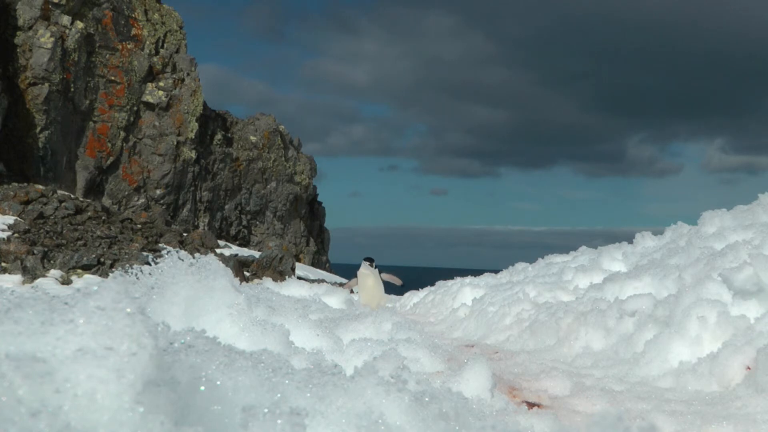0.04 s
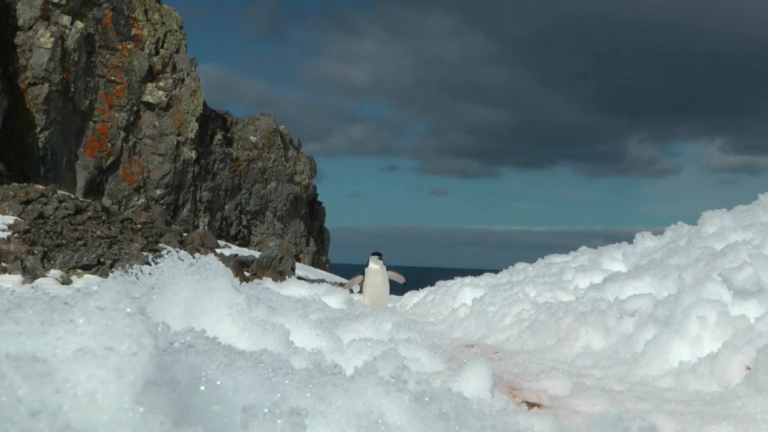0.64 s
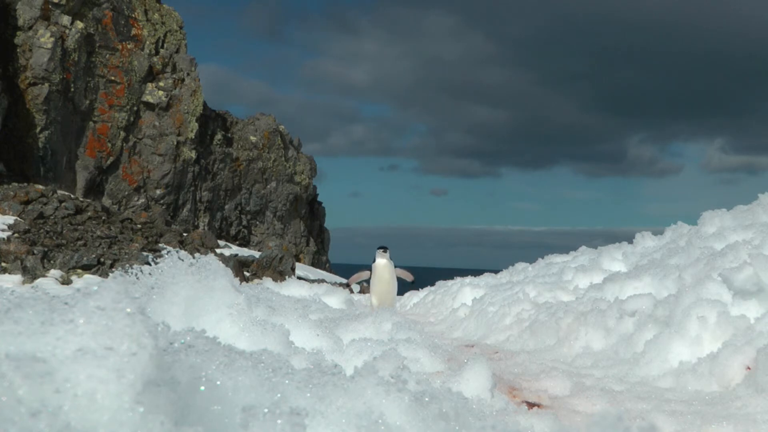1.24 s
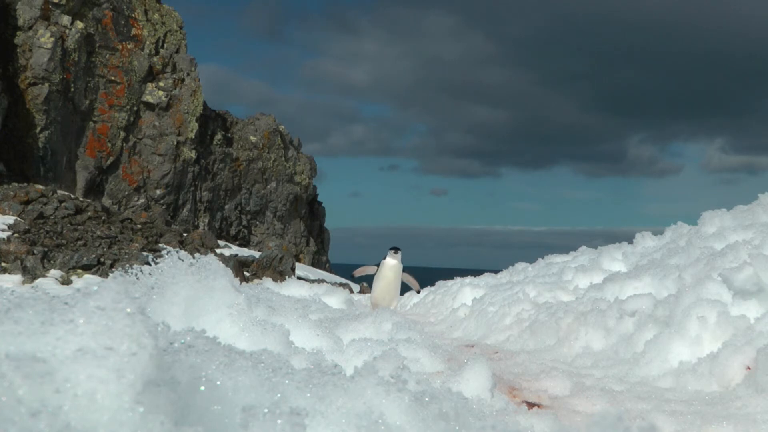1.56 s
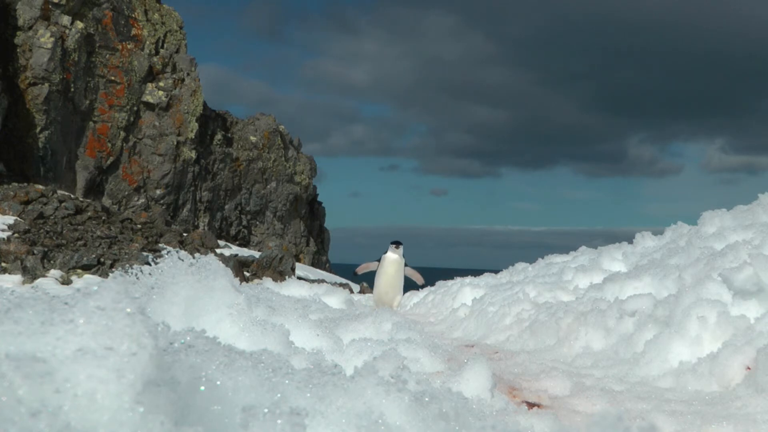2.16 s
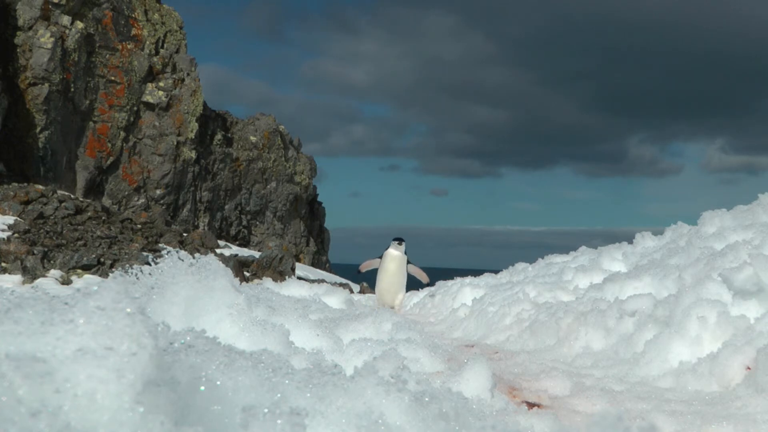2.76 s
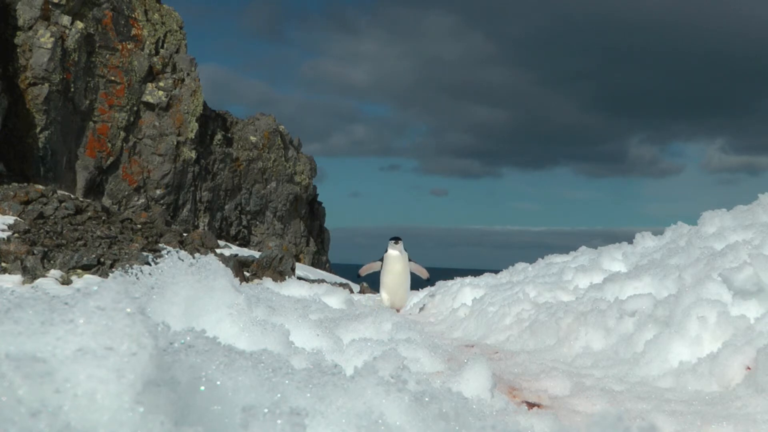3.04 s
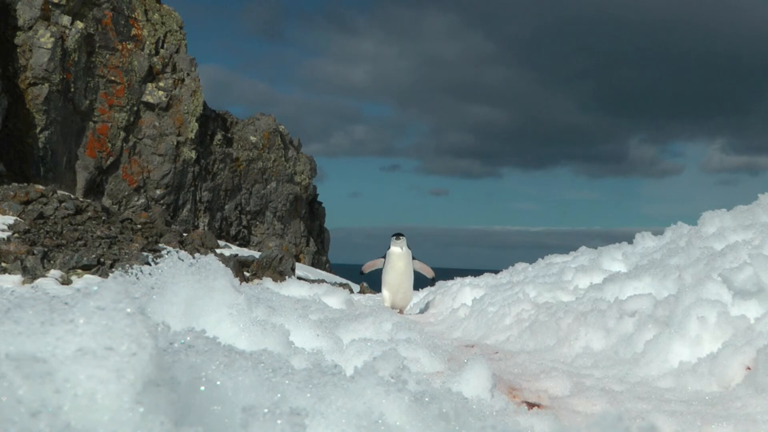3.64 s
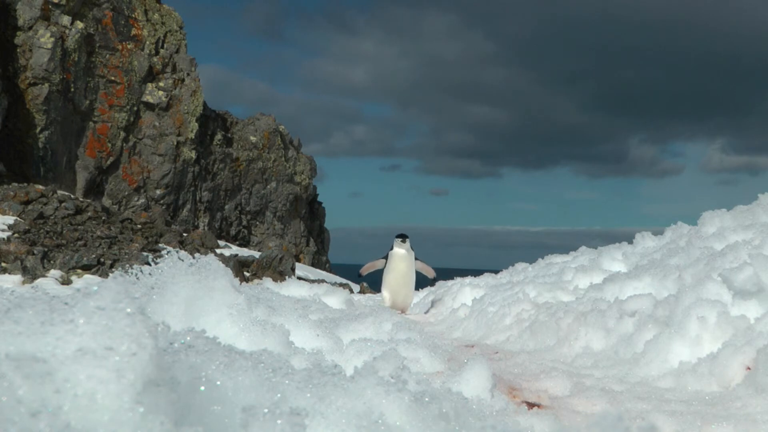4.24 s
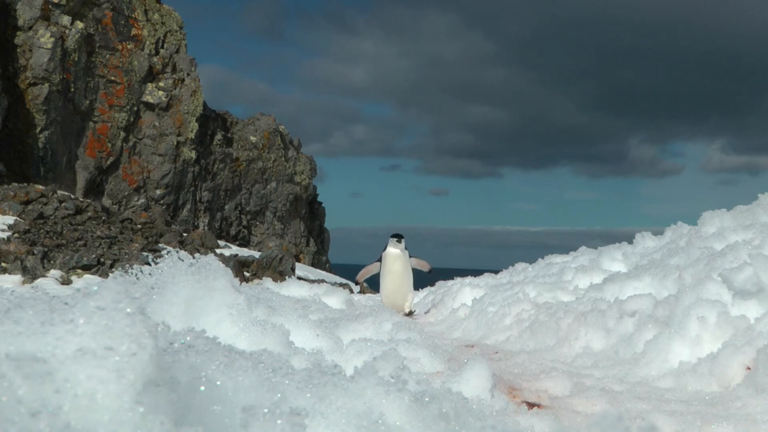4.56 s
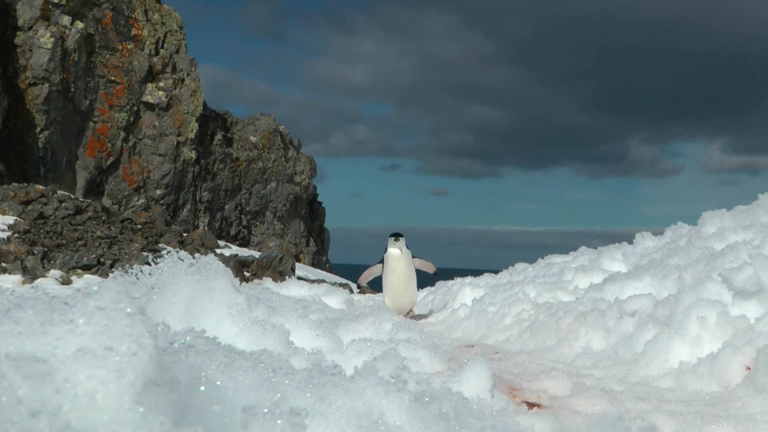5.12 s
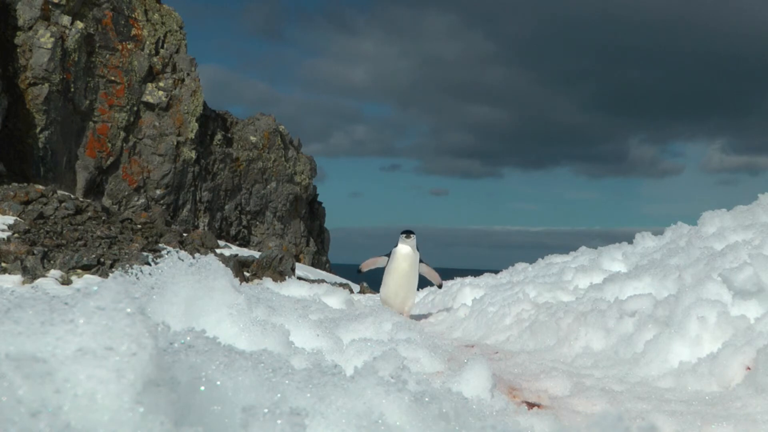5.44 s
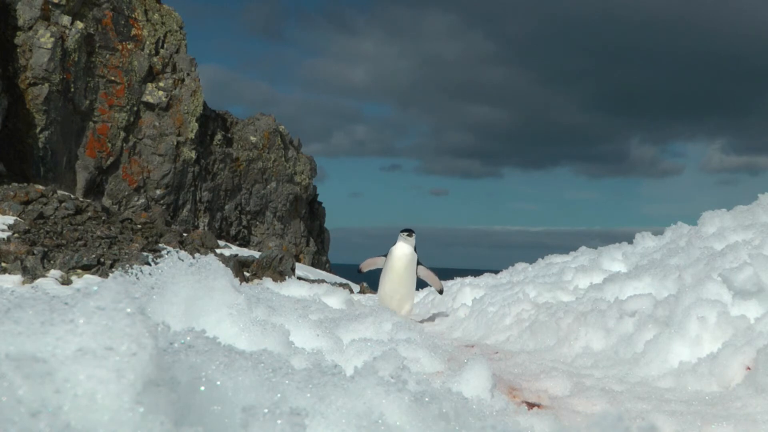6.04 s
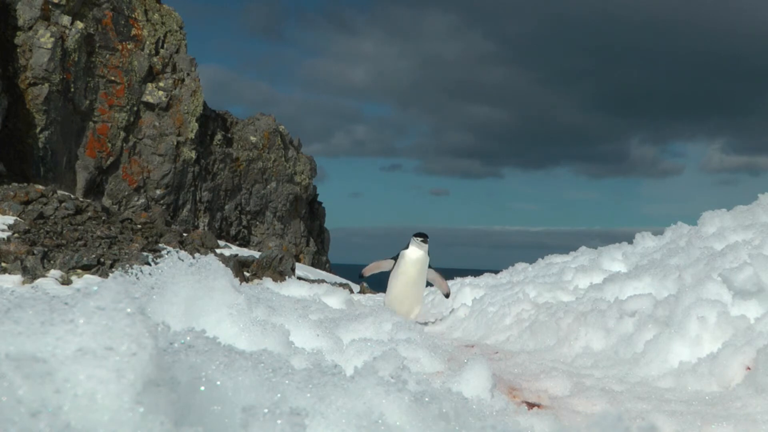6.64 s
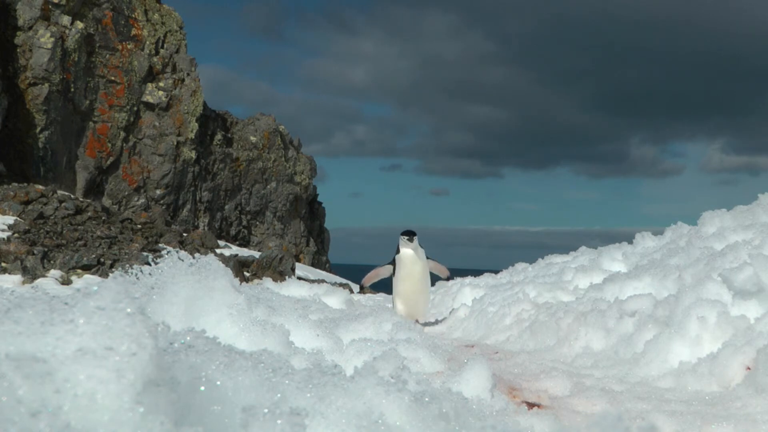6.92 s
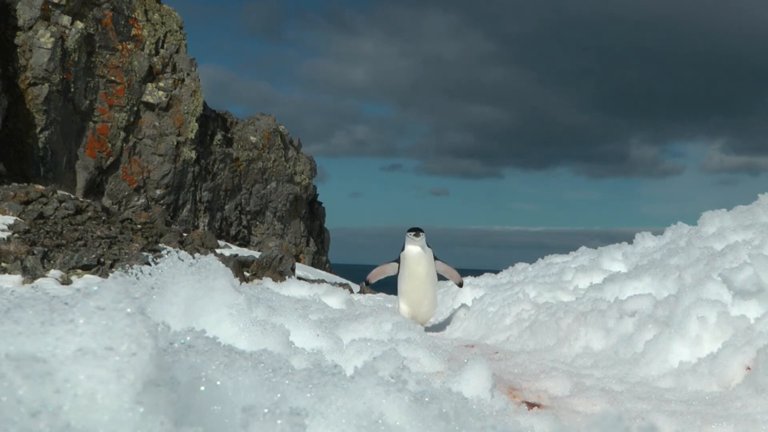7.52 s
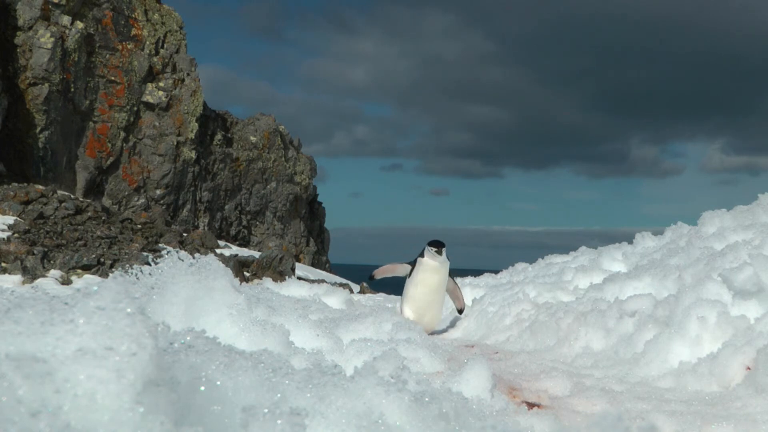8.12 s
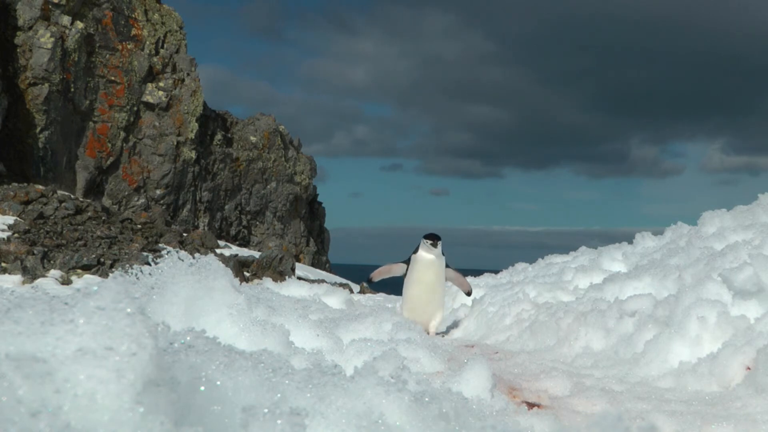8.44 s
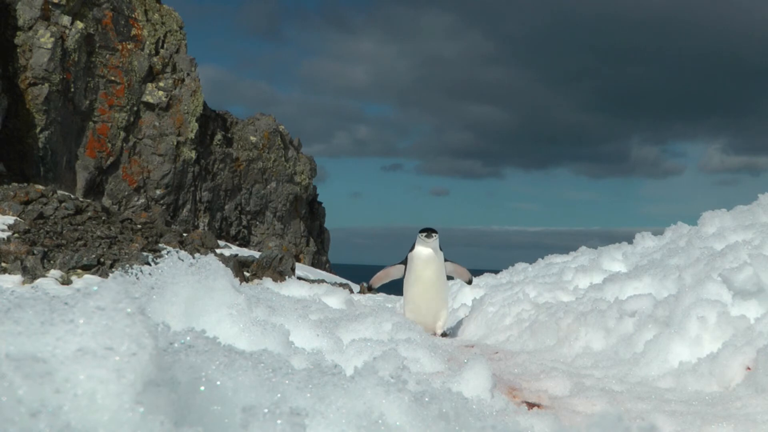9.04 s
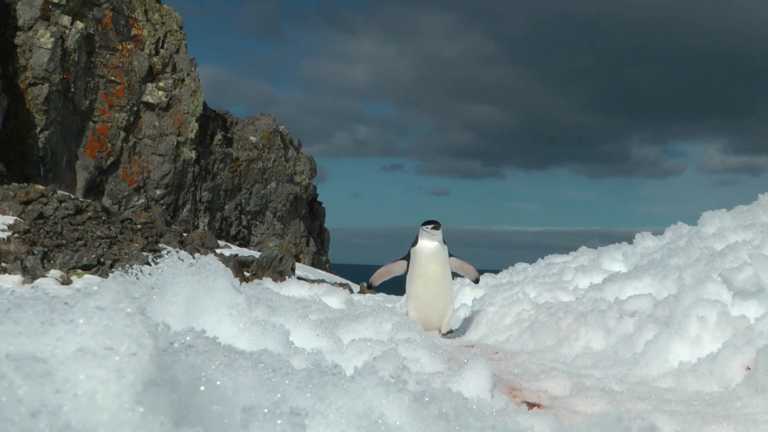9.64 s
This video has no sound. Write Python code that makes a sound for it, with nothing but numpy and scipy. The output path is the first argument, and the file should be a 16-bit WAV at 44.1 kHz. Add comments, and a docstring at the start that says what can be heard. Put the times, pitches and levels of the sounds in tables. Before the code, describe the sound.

Wind buffets the microphone on a snowy shore as distant penguins trade short honks, hoarse brays and squeaky yelps.

```python
"""Penguins whoop, squawk and yelp some way off on a snowy shore, over the din of their colony.
The syrinx whoops upward on indrawn air, squawks downward on pressed-out air, holds arching honks
and breaks into yelps; its two sides clash in hoarse brays. Gusts thump the microphone over an
uneven breeze, snow crunches faintly, and the camera adds its own hum and hiss."""
import sys
import numpy as np
from scipy import signal
from scipy.fft import rfft, irfft, next_fast_len
from scipy.io import wavfile
from scipy.ndimage import uniform_filter1d

SR = 44100
rng = np.random.default_rng(int(sys.argv[2]) if len(sys.argv) > 2 else 0)


def output_pcm(signal):
    """Save a mono or channel-first signal as 16-bit PCM at the path in sys.argv[1].

    Samples are clipped to [-1, 1] before scaling.
    """
    pcm = np.clip(np.atleast_2d(signal).T, -1, 1) * 32767
    wavfile.write(sys.argv[1], SR, np.round(pcm).astype(np.int16))


N = 431298
TIME = np.arange(N) / SR


def undb(db):
    """Decibels to gain."""
    return 10 ** (np.asarray(db) / 20)


def unit(x):
    """Scale to rms 1."""
    return x / np.sqrt(np.mean(x ** 2) + 1e-20)


def spectrum_db(points, hz):
    """Interpolate (Hz, dB) points on a log-frequency axis."""
    f, db = np.transpose(points)
    return np.interp(np.log(hz + 1), np.log(f), db)


def colour(x, db_at):
    """Filter by the gain db_at(hz); rms 1."""
    size = next_fast_len(len(x))
    gain = undb(db_at(np.fft.rfftfreq(size, 1 / SR)))
    return unit(irfft(rfft(x, size) * gain, size)[:len(x)])


def lowpass(x, hz):
    """Zero-phase low-pass."""
    return signal.sosfiltfilt(signal.butter(2, hz, fs=SR, output="sos"), x)


def noise(points, n=N):
    """Noise shaped by (Hz, dB) points; rms 1."""
    return colour(rng.standard_normal(n), lambda f: spectrum_db(points, f))


def walk(rate_hz, n=N):
    """Smooth random wander; spread near 1."""
    k = max(int(SR / rate_hz), 2)
    steps = np.repeat(rng.standard_normal(n // k + 1), k)
    return 1.3 * uniform_filter1d(uniform_filter1d(steps, k), k)[:n]


def phase_rad(hz):
    """Running phase of a pitch curve."""
    return 2 * np.pi * np.cumsum(hz) / SR


def swell(n, rise_s, fall_s):
    """Envelope that opens, holds and closes."""
    t = np.arange(n) / SR
    opening = np.sin(np.pi / 2 * np.clip(t / rise_s, 0, 1))
    closing = np.sin(np.pi / 2 * np.clip((t[-1] - t) / fall_s, 0, 1))
    return opening * closing


def pulse(t, peak_s):
    """Envelope that rises to 1, then decays."""
    return t / peak_s * np.exp(1 - t / peak_s)


def add(track, start_s, x):
    """Mix x into track."""
    i = int(start_s * SR)
    x = x[max(-i, 0):max(N - i, 0)]
    i = max(i, 0)
    track[i:i + len(x)] += x


# camera noise floor: (frequency [Hz], level [dB])
HISS_SPECTRUM = [(20, 12), (90, 31), (180, 1), (330, 8), (600, 6.5), (1200, 2), (4000, 4), (9000, -4.5),
                 (14000, -1.5), (16000, -11)]
def camera_hiss(mid_db=-56.5, side_db=-62.5):
    """Steady self-noise; returns mid, side."""
    side = noise([(30, 19), (120, 11.5), (400, -1), (1000, -2), (3000, -125), (7500, -14), (11000, -36)])
    return undb(mid_db) * noise(HISS_SPECTRUM), undb(side_db) * side


# motor resonances: (frequency [Hz], width [Hz], level [dB])
MOTOR_MODES = [(243, 11.2, -69), (707, 16.35, -72.5), (799, 14.37, -78)]
def motor_hum():
    """Narrow, wavering resonances of the camera motor."""
    out = np.zeros(N)
    for hz, width_hz, db in MOTOR_MODES:
        tone = np.sin(phase_rad(hz + width_hz / 2 * walk(40)))
        out += undb(db) * unit(tone * undb(2 * walk(20)))
    return out


# snow giving way: (start [s], length [s], level [dB])
SNOW_CRUNCHES = [(4.4, 0.22, -64), (5.343, .06, -65), (6.484, 0.071, -65), (7.847, 0.16, -61),
                 (8.183, 0.13, -63.5), (8.513, 0.042, -55.5), (8.548, 0.053, -58.5)]
def snow():
    """Icy grains give way in short, fine crunches."""
    out = np.zeros(N)
    for start_s, length_s, db in SNOW_CRUNCHES:
        n = int(length_s * SR)
        grains = noise([(1000, -1), (6000, 17), (14000, 10.5), (16000, -25)], n)
        grains *= undb(2 * walk(700, n))
        add(out, start_s, undb(db) * unit(grains) * swell(n, rise_s=.01, fall_s=.034))
    return out


# flow between gusts: (time [s], level [dB])
BREEZE_LEVELS = [(0.0, -52), (1.06, -69.5), (1.39, -52), (1.82, -53.5), (2.86, -51.5), (3.18, -43.5),
                 (3.51, -37.5), (3.89, -42.5), (4.22, -38.5), (4.6, -46), (4.98, -47), (5.45, -41.5),
                 (5.94, -40.5), (6.29, -49.5), (7.05, -54.5), (7.25, -47), (7.46, -57), (7.71, -51.5),
                 (8.12, -42), (9.67, -51), (9.78, -68)]
# gusts: (time [s], decay [s], level [dB], front jolt re gust [dB])
WIND_GUSTS = [(.225, 0.047, -38, -4), (1.25, 0.077, -34.5, 0), (1.512, 0.089, -38.5, 11),
              (1.693, 0.037, -44, -3), (2.017, 0.073, -30.5, 1), (2.263, 0.055, -36, -16),
              (2.343, 0.15, -37, 9), (2.485, 0.0075, -37.5, 12.5), (2.624, 0.091, -29.5, -2),
              (2.745, 0.087, -28, -14), (2.798, 0.059, -34, 7), (2.877, 0.013, -28, 2.5),
              (3.262, 0.032, -30.5, -4), (3.304, 0.099, -29, 13.5), (3.591, 0.063, -25, 2),
              (3.698, 0.072, -30, 5), (3.76, 0.027, -26.5, -3), (3.941, 0.06, -29, 4),
              (4.066, .015, -28.5, -1), (4.196, 0.0058, -28, 13.5), (4.329, 0.048, -22, 6),
              (4.516, 0.11, -23.5, -1.5), (4.62, 0.0088, -28.5, 9), (4.744, 0.033, -25.5, 2),
              (4.779, 0.086, -26, 9), (5.063, 0.0053, -25.5, 0.5), (5.14, 0.039, -26.5, 3.5),
              (5.234, 0.018, -27, -2.5), (5.575, .025, -30.5, -1), (5.637, 0.03, -24, 4.5),
              (5.675, 0.027, -27.5, -7), (5.962, 0.025, -34.5, -0.5), (6.057, 0.028, -35, -6),
              (6.588, 0.027, -37.5, -5), (6.735, 0.019, -30.5, -8), (7.076, 0.066, -31, 4),
              (7.158, 0.013, -27.5, 12), (7.238, 0.078, -26, 7), (7.959, 0.038, -32.5, -13),
              (8.118, 0.014, -33.5, 8.5), (8.27, 0.086, -36, 5), (8.349, 0.023, -31, 6.5),
              (8.776, 0.0074, -39, 11), (8.904, 0.02, -31.5, -12), (9.002, 0.09, -32.5, 7),
              (9.549, 0.31, -42, -7)]
def airflow_db(breeze_db=1.5, flutter_db=1.5, attack_s=.013, lead_db=-12, lead_s=.099):
    """Wind strength: over a fluttering breeze each gust stirs the air, hits quickly and dies away."""
    breeze = undb(np.interp(TIME, *np.transpose(BREEZE_LEVELS)) + breeze_db + flutter_db * walk(22))
    power = breeze ** 2
    for time_s, decay_s, db, _ in WIND_GUSTS:
        t = TIME - time_s - attack_s
        hit = np.exp(-(t / np.where(t < 0, attack_s, decay_s)) ** 2)
        stir = undb(lead_db) * np.exp(-(t / (lead_s + decay_s * (t > 0))) ** 2)
        power += undb(db) ** 2 * (hit ** 2 + stir ** 2)
    return 10 * np.log10(power)


def buffets(jolt_hz=215, trail_db=-15, delay_s=.00201):
    """Each gust front jolts the diaphragm through a few swings; small eddies trail it."""
    out, t = np.zeros(N), np.arange(SR // 16) / SR
    for time_s, _, db, jolt_db in WIND_GUSTS:
        hz = jolt_hz * np.exp(.14 * rng.standard_normal())
        swing = np.sin(2 * np.pi * hz * t + rng.uniform(0, 2 * np.pi)) * pulse(t, peak_s=.003)
        eddies = noise([(100, 18), (430, 1), (700, -19.5), (1200, -19.5), (3000, -71)], len(t))
        trail = undb(trail_db) * eddies * pulse(t, peak_s=.0052)
        add(out, time_s + delay_s, undb(db + jolt_db) * (swing + trail))
    return out


# hard gusts tearing at the microphone: (time [s], level [dB])
GUST_RIPS = [(2.797, -43), (3.593, -43), (3.7, -44), (4.329, -29), (4.619, -33.5), (5.637, -29.5),
             (7.242, -42)]
def rips():
    """Bursts of very small eddies, brighter than the rumble."""
    out, t = np.zeros(N), np.arange(SR // 25) / SR
    spectrum = [(150, -15), (400, 5), (700, -3.5), (1200, -21.5), (3000, -34), (8000, -66)]
    for time_s, db in GUST_RIPS:
        add(out, time_s, undb(db) * noise(spectrum, len(t)) * pulse(t, peak_s=.0023))
    return out


# turbulence, mid and side: (frequency [Hz], level [dB])
EDDY_MID_SPECTRUM = [(20, -18), (40, -2.5), (70, 1), (130, 3), (210, -1), (320, -5), (480, -20.5),
                     (700, -28.5), (1000, -42), (2000, -53), (5000, -66)]
EDDY_SIDE_SPECTRUM = [(20, -34), (60, 2.5), (125, -2.5), (220, 6.5), (340, 10), (500, -7.5), (700, -12.5),
                      (1000, -27.5), (2000, -32), (5000, -81)]
def wind(buffet_db=-2, flicker_db=3.5, strong_db=-28, side_db=-3):
    """Rumble at the capsules, brighter as stronger flow sheds smaller eddies; returns mid, side."""
    flow_db = airflow_db()
    force = undb(flow_db + flicker_db * walk(60))
    small_gain = undb(flow_db - strong_db)
    channels = []
    for spectrum in (EDDY_MID_SPECTRUM, EDDY_SIDE_SPECTRUM):
        eddies = noise(spectrum)
        large = lowpass(eddies, hz=240)
        rumble = (large + (eddies - large) * small_gain) / np.sqrt(1 + .6 * small_gain ** 2)
        channels.append(force * rumble + undb(buffet_db) * (buffets() + rips()))
    return channels[0], undb(side_db) * channels[1]


def cliff_echo(x, t60_s=.012, gap_s=.0071):
    """Scattered echoes from rock and snow."""
    t = np.arange(SR // 2) / SR
    response = rng.standard_normal(len(t)) * undb(-60 * t / t60_s) * (t > gap_s)
    return signal.fftconvolve(x, response / np.linalg.norm(response))[:N]


def syrinx(hz, jitter, odd_db, rasp, fourth_db=0, harmonics=14, uneven_db=0):
    """An unsteady harmonic voice with a puff of turbulent air each cycle."""
    n = len(hz)
    phase = phase_rad(hz * (1 + jitter * walk(350, n)))
    tone = np.zeros(n)
    for k in range(1, harmonics + 1):
        flare_db = uneven_db * walk(45, n) if uneven_db and k != 4 else 0
        gain = undb(odd_db * (k % 2) + fourth_db * (k == 4) + flare_db)
        scatter_rad = rng.uniform(0, 2 * np.pi)  # from the throat and the path over the snow
        tone += gain * np.cos(k * phase + scatter_rad)
    air = rng.standard_normal(n) * (1 + .5 * np.cos(phase))
    return unit(tone) + rasp * unit(air)


def far_bird(syllable_rate_hz=5, pitch_hz=490):
    """A distant bird's uneven syllables, each rising a little and falling away."""
    syllables = np.cumsum(syllable_rate_hz * np.exp(.3 * walk(5))) / SR + rng.uniform()
    progress = syllables % 1
    hz = pitch_hz * np.exp(.1 * walk(6)) * (1 - .7 * (progress - .3) ** 2)
    voice = syrinx(hz, jitter=.018, odd_db=-2, rasp=.7, harmonics=9)
    return voice * np.sin(np.pi * progress) * undb(2.5 * walk(9))


# distant voice filter: (frequency [Hz], gain [dB])
FAR_RESPONSE = [(400, -34), (850, -13.5), (1250, -2), (1750, 8.5), (2400, -0.5), (3200, -2.5), (5000, -17),
                (8000, -19), (14000, -26)]
# colony din: (time [s], level [dB])
COLONY_LEVELS = [(0, -52.5), (1, -58), (2, -58), (3, -60), (4, -59), (5, -55), (5.9, -52), (6.6, -50),
                 (7.5, -51), (8.4, -55), (9.1, -52), (9.78, -50)]
def colony(birds=5):
    """Further birds call across one another and merge into a din."""
    voices = sum(far_bird() for _ in range(birds))
    din = colour(voices, lambda f: spectrum_db(FAR_RESPONSE, f))
    return din * undb(np.interp(TIME, *np.transpose(COLONY_LEVELS)))


def overdriven_side(hz):
    """One side of an overdriven syrinx: pitch lurches, every third cycle is stronger, level rattles."""
    n = len(hz)
    growl = 1 + .8 * np.sin(phase_rad(hz / 3))
    lurching_hz = hz * (1 + .018 * walk(60, n))
    voice = syrinx(lurching_hz, jitter=.014, odd_db=-2, rasp=.2, uneven_db=2)
    return growl * voice * undb(2.8 * walk(110, n))


# hoarse voice filter: (frequency [Hz], gain [dB])
HOARSE_RESPONSE = [(500, -18), (850, -19), (1020, -4), (1280, -2), (1480, 5), (1800, 12.5), (2400, 13.5),
                   (2950, 0), (3400, 0), (4200, -11.5), (5100, -7), (6500, -22), (10000, -12)]
def hoarse_note(length_s, treble_db, chest_db, pitch_hz=485, arch=.2, split=.06):
    """A pressed syllable: the two sides of the syrinx clash at different pitches."""
    n = int(length_s * SR)
    hz = pitch_hz * (1 - arch * np.linspace(-.7, 1.2, n) ** 2)
    source = overdriven_side(hz * (1 + split)) + overdriven_side(hz * (1 - split))
    tilt = [(1250, chest_db), (1700, 0), (2500, 0), (3600, treble_db)]
    voice = colour(source, lambda f: spectrum_db(HOARSE_RESPONSE, f) + spectrum_db(tilt, f))
    effort = swell(n, rise_s=.25 * length_s, fall_s=.36 * length_s)
    dull = lowpass(voice, hz=2900)
    overtones = 1.11 * effort * (voice - dull)  # open only at full effort
    return effort * (dull + overtones)


def glide(length_s, pitch_hz, slide, arch):
    """Pitch curve in Hz: slides by a share of itself and sags at both ends."""
    u = np.linspace(-1, 1, int(length_s * SR))
    return pitch_hz * (1 + slide * u / 2 - arch * u ** 2)


# throat resonances: (frequency [Hz], gain [dB])
THROAT_RESPONSE = [(450, -36), (800, -41), (1020, -15), (1250, -20), (1480, -5.5), (1750, 0), (2150, -4.5),
                   (2550, 3.5), (3000, 3.5), (3500, -3), (4200, -5), (5100, -19), (8000, -41)]
def clear_note(hz, odd_db, treble_db, chest_db, rise_s, fall_s, strain=0, beak_hz=3000, lift_db=0):
    """Throat tuned to the fourth harmonic; strain adds level and roughness, the beak may lift a band."""
    n = len(hz)
    wavering_hz = hz * (1 + .008 * walk(70, n))
    source = syrinx(wavering_hz, jitter=.0046 + .042 * strain, odd_db=odd_db,
                    rasp=.036 + .5 * strain, fourth_db=11, uneven_db=3.5)
    source *= undb(1.8 * walk(110, n))
    tilt = [(1250, chest_db), (1700, 0), (2100, 0), (3000, treble_db)]

    def tract_db(f):
        beak_db = lift_db * np.exp(-((f - beak_hz) / 260) ** 2)
        return spectrum_db(THROAT_RESPONSE, f) + spectrum_db(tilt, f) + beak_db

    return undb(4 * strain) * colour(source, tract_db) * swell(n, rise_s, fall_s)


# brays: (start [s], length [s], level [dB], treble [dB])
BRAY_NOTES = [(1.019, 0.028, -66, -3), (1.285, 0.051, -64, 4), (2.54, 0.083, -56, -2),
              (2.648, 0.063, -59, 7), (2.921, 0.041, -57, 10), (3.016, 0.049, -55, -1),
              (3.133, 0.17, -56.5, -6), (3.385, 0.055, -52, 0), (3.46, 0.067, -52.5, 3),
              (3.648, 0.076, -54.5, 7), (3.775, 0.057, -54, -6), (3.849, 0.073, -57.5, 1),
              (4.048, 0.23, -53, 8), (4.325, 0.22, -51.5, 7), (4.621, 0.1, -55.5, 3),
              (4.846, .18, -54, 7.5), (5.074, 0.07, -54, 7), (5.222, 0.068, -57, 1),
              (5.308, 0.17, -47.5, 3.5), (5.59, 0.15, -48.5, -2), (5.966, 0.21, -50, 5.5),
              (6.283, 0.15, -50.5, 4), (6.456, 0.13, -50.5, -4), (6.671, 0.19, -46, 4),
              (6.93, 0.06, -53, 5), (7.01, .15, -49.5, 9), (7.186, 0.088, -50.5, 9),
              (7.406, 0.085, -51.5, 10), (7.651, 0.19, -51.5, 11.5), (7.844, 0.1, -50, 6.5),
              (8.081, 0.094, -51.5, 8), (8.485, 0.16, -52, 1), (8.683, 0.16, -51.5, 7.5),
              (8.931, 0.044, -50.5, 6), (9.01, 0.19, -48.5, 4), (9.149, 0.14, -55.5, -29),
              (9.33, 0.086, -53, -3), (9.59, 0.17, -57, -10)]
def brays(chest_db=7, overhang_s=.018):
    """Hoarse syllables, mostly of the deep-chested birds; the near bird adds a few early ones."""
    out = np.zeros(N)
    for start_s, length_s, db, treble_db in BRAY_NOTES:
        bray = hoarse_note(length_s + 2 * overhang_s, treble_db, chest_db)
        add(out, start_s - overhang_s, undb(db) * bray)
    return out


# honks: (start [s], length [s], pitch [Hz], slide [share], arch [share], level [dB], treble [dB],
# chest [dB], rasp [dB], beak resonance [Hz], beak lift [dB])
HONK_NOTES = [(0.529, 0.12, 470, -0.1, 0.015, -50.5, -6.5, -13, -5, 2850, 4),
              (0.668, 0.25, 468, -.045, 0.098, -50, -6, -21, -10, 2700, 6.5),
              (0.801, .094, 487, -0.15, 0.044, -49, -21, -7, -4, 2000, 1),
              (1.971, .1, 469, -.03, .22, -53.5, -7, -16, -5, 2850, 1),
              (2.069, 0.079, 448, -.08, 0, -58.5, -11, -3, -2, 2700, 5),
              (2.403, .12, 417, -0.013, 0.088, -55.5, -9.5, 9, -13, 4220, 16),
              (5.771, 0.12, 490, -0.068, .15, -58.5, -10, 20, -14, 3430, 12),
              (6.001, 0.11, 481, -0.0087, 0.051, -55, -1, 18, 2.5, 3900, 8),
              (6.459, .18, 483.6, -.08, 0.098, -50.5, -12, 19, -21, 2330, 18),
              (8.094, 0.088, 470, -0.091, 0.047, -58, -7, 18, -7, 1420, 7),
              (8.254, .125, 483, -0.061, 0.105, -53.5, 2, 6, -4, 2340, 22),
              (8.68, .1, 472, 0, .1, -55, -4, 23, -9, 1400, 3),
              (9.091, 0.13, 458, -0.037, .09, -50.5, -33, -4, -2, 1800, 0),
              (9.444, .13, 464.4, -0.12, 0.083, -55.5, -12, 23, -16, 3280, 12),
              (9.595, 0.12, 469, 0.0038, 0.18, -50, -28, 9, -4, 1850, 0),
              (9.719, 0.074, 446, 0.058, 0.11, -48, -28, 2, -7, 1800, 2)]
def honks(rasp_treble_db=4, overhang_s=.012):
    """Held, arching notes, each with its own beak opening, over a hoarse edge."""
    out = np.zeros(N)
    for (start_s, length_s, hz, slide, arch, db,
         treble_db, chest_db, rasp_db, beak_hz, lift_db) in HONK_NOTES:
        span_s = length_s + 2 * overhang_s
        tone = clear_note(glide(span_s, hz, slide, arch), odd_db=2.5, treble_db=treble_db,
                          chest_db=chest_db, rise_s=.025, fall_s=.019, beak_hz=beak_hz, lift_db=lift_db)
        rasp = hoarse_note(span_s, treble_db + rasp_treble_db, chest_db)
        add(out, start_s - overhang_s, undb(db) * (tone + undb(rasp_db) * rasp))
    return out


# whoops: (start [s], length [s], pitch [Hz], level [dB])
WHOOP_NOTES = [(0, 0.045, 448, -46), (0.257, 0.089, 483, -49), (0.45, 0.095, 461, -52),
               (1.013, .045, 482, -56), (1.283, 0.058, 484, -55.5), (1.605, 0.046, 430, -51.5),
               (6.212, 0.063, 492, -55), (6.268, 0.054, 456, -68), (6.766, 0.0342, 457, -48),
               (7.244, 0.061, 523, -52), (8.657, 0.062, 447, -53.5), (9, 0.044, 457, -47.5)]
def whoops(slide=.234, arch=.0614, rasp_db=-9, overhang_s=.008):
    """Notes on indrawn air: they open softly and climb, with little rasp."""
    out = np.zeros(N)
    for start_s, length_s, hz, db in WHOOP_NOTES:
        span_s = length_s + 2 * overhang_s
        pitch_hz = glide(span_s, hz, slide, arch)
        tone = clear_note(pitch_hz, odd_db=4, treble_db=-12.5, chest_db=-10, rise_s=.028, fall_s=.026)
        rasp = hoarse_note(span_s, treble_db=7.5, chest_db=-17)
        add(out, start_s - overhang_s, undb(db) * (tone + undb(rasp_db) * rasp))
    return out


# squawks: (start [s], length [s], pitch [Hz], slide [share], level [dB], rasp [dB], chest [dB])
SQUAWK_NOTES = [(0.053, 0.075, 457, -.2, -48.5, -10, -6), (0.098, 0.068, 510, -.2, -57, 6, -6),
                (0.143, .07, 522, -.2, -57, 5, -18), (0.18, 0.068, 468, -.22, -49, -2, -17),
                (0.329, 0.098, 451.5, -0.24, -49.5, -1, -10), (.669, 0.063, 459, -.2, -60.5, 8.5, -19),
                (1.128, 0.066, 468, -.24, -58, 0, -14), (1.399, 0.054, 472, -0.21, -50, -8, -18),
                (1.532, 0.039, 450, -.2, -61, 3.5, -12), (1.69, 0.068, 466.5, -.3, -52, -2, -10),
                (1.899, 0.07, 432, -0.12, -57.5, -5, -7), (2.28, 0.032, 422, -0.16, -56.5, -13, -9),
                (2.839, 0.058, 450, -0.23, -57, -15, -5), (2.654, 0.063, 443, -.15, -60, -9, 4),
                (3.185, 0.078, 481, -0.19, -59.5, -9, 5), (3.387, .05, 455, -.2, -56, -6, 0),
                (3.487, 0.055, 438, -0.22, -57.5, -13, -2), (3.784, 0.056, 464, -0.202, -57, -7, -2),
                (3.86, 0.055, 450, -0.081, -57.5, -14, -3), (4.554, 0.06, 476, -0.27, -53.5, 1, 2),
                (4.701, 0.044, 585, -0.083, -61, -16, -3), (4.919, 0.057, 465, -0.18, -54, -11, 0),
                (5.073, 0.088, 428, -.17, -58, -19, 3), (5.374, .1, 463, -0.3, -51.5, -1, 18),
                (5.618, 0.057, 473, -0.19, -54, 3, 8), (5.673, 0.077, 493, -0.29, -51.5, -16, 11),
                (6.133, 0.096, 461, -0.18, -54, -2, 20), (6.537, 0.054, 582, -0.164, -60, -15, -5),
                (6.56, 0.061, 440, -0.23, -56, -14, 15), (6.6, 0.076, 505, -0.22, -51.5, -10, 18),
                (6.8, 0.053, 574, -0.28, -45, -6, 6), (7.002, 0.028, 474, -0.29, -55, -12, 0),
                (7.102, 0.045, 527, -0.22, -53, -1, 3), (7.506, 0.044, 462, -.15, -55, 0, -12),
                (7.559, 0.05, 476, -0.18, -49, -3, -12), (7.678, 0.085, 533, -0.1, -53, -18, 14),
                (8.31, 0.065, 468, -0.18, -56, -2, -3), (9.072, 0.062, 459, -0.25, -49.5, -10, 2),
                (9.387, 0.063, 500, -.25, -50.5, -1, 8), (9.67, 0.12, 460, -0.22, -54, -4, 9)]
def squawks(arch=.023, burst_s=.021, overhang_s=.008, tail_s=.02):
    """Notes on pressed-out air: a rough burst clears and falls as pressure drops; the rasp lingers."""
    out = np.zeros(N)
    for start_s, length_s, hz, slide, db, rasp_db, chest_db in SQUAWK_NOTES:
        span_s = length_s + 2 * overhang_s
        pitch_hz = glide(span_s, hz, slide, arch)
        t = np.arange(len(pitch_hz)) / SR
        tone = clear_note(pitch_hz, odd_db=1.5, treble_db=-7.5, chest_db=chest_db,
                          rise_s=.019, fall_s=.029, strain=.97 * np.exp(-(t / burst_s) ** 2))
        rasp = hoarse_note(span_s + tail_s, treble_db=6.5, chest_db=chest_db)
        add(out, start_s - overhang_s, undb(db) * tone)
        add(out, start_s - overhang_s, undb(db + rasp_db) * rasp)
    return out


def register_drop(pitch_hz, length_s=.066, slide=-.314, rasp_db=-7):
    """A rough squawk as the voice tumbles into its low register."""
    hz = glide(length_s, pitch_hz, slide, arch=0)
    tone = clear_note(hz, odd_db=-2.5, treble_db=-9, chest_db=7.5, rise_s=.018, fall_s=.059,
                      strain=np.linspace(1, 0, len(hz)) ** 2)
    return tone + undb(rasp_db) * hoarse_note(length_s, treble_db=3, chest_db=-9)


# yelps: (time [s], squeak pitch [Hz], squeak level [dB], squawk pitch [Hz], squawk level [dB])
YELP_NOTES = [(0.149, 1580, -49.5, 521, -47), (0.369, 1650, -49.5, 568, -45.5), (.627, 1796, -53, 470, -66),
              (4.9, 1830, -57, 520, -57), (6.283, 1635, -50, 465, -54), (6.338, 1770, -54, 488, -51),
              (6.859, 1630, -47, 518, -44.5), (7.028, 1760, -53.5, 527, -47),
              (7.343, 1650, -50, 539, -43.5), (7.96, 1660, -48.5, 523, -44),
              (8.191, 1630, -55.5, 543, -44.5), (8.79, 1590, -48.5, 471, -43.5),
              (9.015, 1500, -58, 529, -45)]
def yelps(squeak_s=.032, fall=.114, drop_db=-1.5):
    """The voice breaks into a shaky high squeak, second harmonic strongest, then drops back."""
    out, n = np.zeros(N), int(squeak_s * SR)
    for time_s, squeak_hz, squeak_db, squawk_hz, squawk_db in YELP_NOTES:
        shiver = .016 * walk(1000, n)
        phase = phase_rad(squeak_hz * (1 + fall * np.linspace(.5, -.5, n) + shiver))
        tone = undb(-5) * np.sin(phase) + np.sin(2 * phase) + undb(-17) * np.sin(3 * phase)
        envelope = swell(n, rise_s=.014, fall_s=.014) * undb(2 * walk(500, n))
        add(out, time_s - squeak_s / 2, undb(squeak_db) * unit(tone) * envelope)
        add(out, time_s, undb(squawk_db + drop_db) * register_drop(squawk_hz))
    return out


def scene(bray_db=-1, colony_db=-3.5, echo_db=-17, side_echo_db=-11, side_hum_db=-11.5, leftward=.074):
    """Mid/side mix to stereo: birds a little left; wind and motor reach the two sides differently."""
    birds = whoops() + squawks() + honks() + undb(bray_db) * brays() + yelps()
    birds += undb(colony_db) * colony()
    wind_mid, wind_side = wind()
    mid = birds + undb(echo_db) * cliff_echo(birds) + wind_mid + snow() + motor_hum()
    hiss_mid, hiss_side = camera_hiss()
    mid += hiss_mid
    # closely spaced capsules tell left from right only below the treble
    birds_side = lowpass(leftward * birds + undb(side_echo_db) * cliff_echo(birds), hz=3400)
    side = birds_side + wind_side + undb(side_hum_db) * motor_hum() + hiss_side
    return np.array([mid + side, mid - side])


def record(dry):
    """The camera cuts the top of the treble."""
    cutoff_hz = 15700
    return signal.sosfilt(signal.ellip(10, .2, 80, cutoff_hz, fs=SR, output="sos"), dry)


dry = scene()
out = record(dry)
output_pcm(out)
```